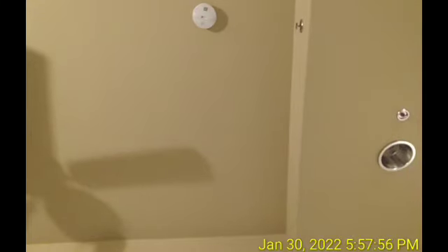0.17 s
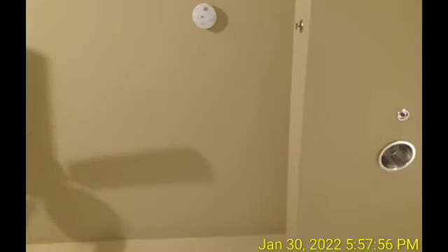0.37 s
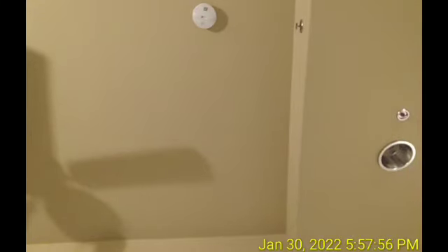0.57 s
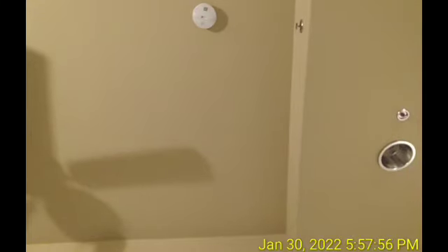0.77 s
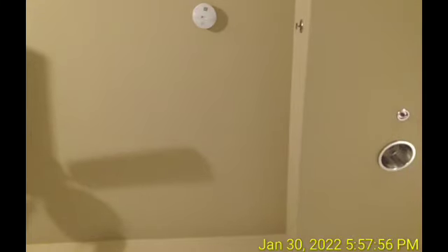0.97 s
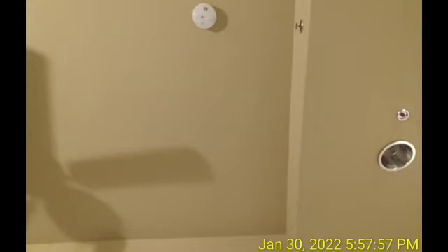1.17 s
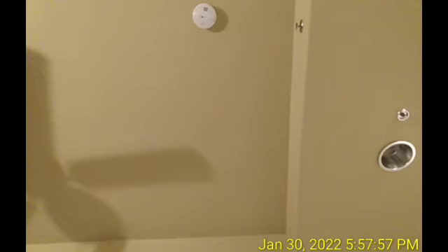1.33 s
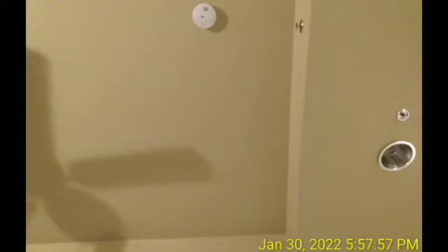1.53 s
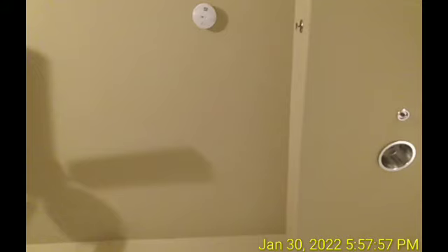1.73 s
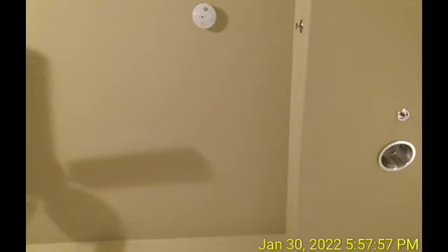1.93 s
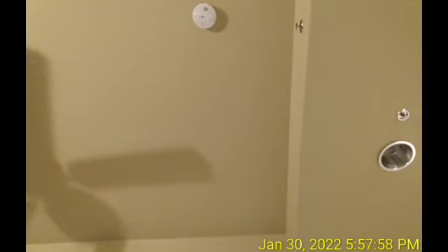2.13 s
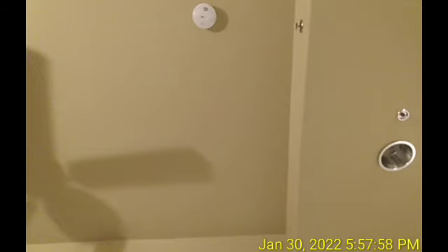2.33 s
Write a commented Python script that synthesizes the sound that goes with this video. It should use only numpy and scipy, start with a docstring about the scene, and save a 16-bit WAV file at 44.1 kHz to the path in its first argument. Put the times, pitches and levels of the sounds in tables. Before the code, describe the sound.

Heavy, muffled thumps from the floor above strike at about 0.25 and 0.7 seconds, booming low and faintly rattling fittings, then fade into quiet room hiss in a small apartment, picked up by a fixed indoor microphone.

```python
"""Heavy steps on the floor above boom in a few low ceiling modes, struck by softened clicks.
Dull noise thuds after each blow over a deep filtered-noise rumble; fittings rattle and sizzle in
noise bursts, one clinks in damped modes, and a faint scuff of resonant noise comes late.
Wavering sines make a motor's faint hum; coloured noise is the room air, and recorder hiss
swells with the thumps, as if the recorder's gain opened."""
import sys
import numpy as np
from scipy import signal
from scipy.fft import rfft, irfft
from scipy.io import wavfile

SR = 44100
rng = np.random.default_rng(int(sys.argv[2]) if len(sys.argv) > 2 else 0)


def linear_from_db(decibels):
    """Turn decibels (scalar or array-like) into linear amplitude factors; 0 gives 1."""
    return 10 ** (np.asarray(decibels, float) / 20)


def master_out(mix):
    """Clip the mix to full scale and print it as 16-bit PCM to the path in sys.argv[1]."""
    frames = np.transpose(np.atleast_2d(mix))
    ceiling = np.clip(frames, -1, 1)
    pcm = np.round(ceiling * 32767).astype(np.int16)
    wavfile.write(sys.argv[1], SR, pcm)


N = 105840  # 2.4 s

# Contacts of feet and objects overhead. Each row: start in seconds, then the strengths in dB
# that drive the boom, knock, rap and tap modes.
BLOWS = [(0.047, -62, -62, -51, -70), (0.147, -57.5, -66, -58, -80), (0.229, -47, -38.5, -66, -69),
         (.248, -33.5, -31.5, -41.5, -48), (0.27, -54, -85, -38, -56.5), (0.304, -33, -36, -37, -48),
         (0.321, -43, -81, -55, -46), (0.364, -58, -55, -71, -62.5), (0.401, -48, -60, -46, -54),
         (0.426, -65, -55, -73, -53), (0.507, -38.5, -47, -62, -60), (0.53, -65, -51, -58, -57.5),
         (0.607, -44.5, -64, -64, -63), (0.667, -53, -62, -68, -45.5), (0.682, -27.5, -50, -57, -57),
         (0.694, -49, -54, -61, -46.5), (0.708, -48, -53, -60, -55), (0.729, -36, -62, -40, -56),
         (.743, -48, -50, -44, -45.5), (0.783, -30.5, -69, -63, -52.5), (0.805, -55, -53, -38, -58),
         (0.857, -44.5, -46, -73, -52.5), (0.882, -63, -50, -67, -52.5), (0.941, -62, -68, -50, -56),
         (0.981, -46.5, -67, -59, -53.5), (1.060, -53, -56, -63, -74), (1.134, -62, -57.5, -55, -59.5),
         (1.15, -76, -49, -65, -65), (1.182, -66.5, -52.5, -54, -67.5), (1.924, -56.5, -59.5, -80, -66.5),
         (1.953, -74, -57, -57, -66), (1.984, -63, -55.5, -68, -81), (2.012, -73, -60, -62, -75),
         (2.039, -66, -56.5, -67, -75), (2.055, -59, -64, -58, -74), (2.161, -89, -68, -61, -71.5),
         (2.295, -71, -64, -71, -82)]
# Ceiling modes, by driving strength. Each row: frequency in Hz, relative level in dB, t60 in seconds.
BOOM_MODES = [(40.75, -1.5, 0.48)]
KNOCK_MODES = [(75.3, 0.22, 0.31)]
RAP_MODES = [(86.8, 0, 0.24)]
TAP_MODES = [(109, 6, 0.16), (147.9, 9, 0.12), (173.1, -15.5, 0.8), (185, -7, 0.09), (228, -13, 0.067),
             (256, -4, 0.27), (310, -0.5, 0.094), (355, -9, 0.092)]
CONTACT_S, MODE_SPREAD_DB, LEFT_LEAD_S = 0.0013, 0.97, 0.0003

# Thud colour. Each row: frequency in Hz, relative density in dB per Hz.
THUD_COLOUR = [(50, -23.5), (130, -3), (240, -13), (345, -17.5), (500, -22.5), (950, -35.5), (2000, -33.5),
               (4000, -77)]
THUD_RE_TAP_DB, THUD_T60_S, THUD_RISE_S = -6, 0.5, 0.011

# Building rumble level. Each row: time in seconds, rms level in dB.
RUMBLE_LEVEL = [(0, -58), (.2, -76), (.5, -59.5), (1.1, -62.5), (1.3, -64.5), (1.652, -62.5), (1.75, -71.5),
                (1.88, -83), (1.959, -61.5), (2.1, -67.5), (2.4, -78)]
# Rumble resonances. Each row: frequency in Hz, width in Hz, relative level in dB.
RUMBLE_PEAKS = [(39.7, 9, -0.5), (51.5, 14, -3), (73.6, 13, -10.5)]

# Shaken fittings. Each row: start in seconds, rattle level in dB, sizzle level in dB.
RATTLES = [(0.239, -66.5, -65), (.275, -66, -71), (0.31, -62.5, -70), (.350, -87, -88), (.396, -100, -74.5),
           (0.679, -86, -61.5), (0.688, -64, -64.5), (0.712, -63.5, -96), (.745, -69.5, -78),
           (0.901, -72.5, -77), (1.040, -105, -78)]
# Rattle and sizzle colours. Each row: frequency in Hz, relative density in dB per Hz.
RATTLE_COLOUR = [(500, -3.5), (1000, -7), (2200, -7), (3500, -12), (6000, -22.5), (10000, -26.5)]
SIZZLE_COLOUR = [(2000, 4), (4000, 11), (6000, 5), (12000, 7), (15300, 6)]
RATTLE_T60_S, RATTLE_RISE_S = 0.55, 0.0056
SIZZLE_T60_S, SIZZLE_RISE_S = 0.19, 0.005

# Modes of one chattering fitting. Each row: frequency in Hz, relative level in dB, t60 in seconds.
CLINK_MODES = [(2190, -11, 0.031), (2380, 3, 0.02), (2600, 10, 0.01), (2900, -6, 0.0096),
               (3220, 2.5, 0.028)]
CLINK_START_S, CLINK_GAP_S = 0.3112, 0.002
CLINK_DB, CLINK_LOSS_DB, CLINK_SPREAD_DB = -69, 0.3, 4.5  # loss per touch

# Faint scuff level. Each row: time in seconds, level in dB before the patchiness.
SCUFF_LEVEL = [(1.6, -107), (1.655, -70), (1.70, -73.5), (1.755, -78), (1.8, -84), (1.85, -100)]
# Scuff resonances. Each row: frequency in Hz, width in Hz, relative level in dB.
SCUFF_PEAKS = [(376, 56, 2), (900, 260, 2.5), (1890, 400, 0.5), (2420, 270, -8.5)]
SCUFF_PATCHY_DB, SCUFF_PATCHY_HZ = 2.5, 25.0

# Motor lines. Each row: frequency in Hz, rms level in dB before the waver.
HUM_LINES = [(59.2, -76), (177.6, -76), (236.9, -80.5), (393, -96)]
HUM_WAVER_DB, HUM_WAVER_HZ = 1.04, 4.9

# Room air colour. Each row: frequency in Hz, relative density in dB per Hz.
AIR_COLOUR = [(25, -19), (45, -14), (80, -6.5), (150, -15.5), (200, -12.5), (349, -12.5), (408, -16),
              (652, -21), (869, -24.5), (1040, -25.5), (2500, -33.5), (5840, -37.5), (15300, -39)]
AIR_DB, AIR_LEFT_LEAN_DB = -69.5, -0.5

# Recorder hiss colour. Each row: frequency in Hz, relative density in dB per Hz.
HISS_COLOUR = [(700, -5), (1500, -3), (3000, -2.3), (6000, -7), (12000, -7.5), (15300, -3)]
HISS_DB, HISS_DB_PER_DB, HISS_LAG_S = -76.5, 0.73, 0.088  # HISS_DB holds at a sound level of -40 dB

# Stereo likeness of the noises. Each row: frequency in Hz, left-right correlation from -1 to 1.
LIKENESS = [(60, 0.95), (130, 0.85), (290, 0.85), (640, 0.46), (1400, -0.34), (3080, 0.038), (6770, -0.19),
            (14900, -0.0079)]


def rms_one(x):
    """Scales to rms 1."""
    return x / np.sqrt(np.mean(x ** 2) + 1e-20)


def at_hz(points, hz):
    """Interpolates a table over log frequency."""
    table_hz, values = np.transpose(points)
    return np.interp(np.log(hz), np.log(table_hz), values)


def over_time(points):
    """Interpolates a (seconds, value) table at every sample."""
    return np.interp(np.arange(N) / SR, *np.transpose(points))


def smooth(x, seconds):
    """One-pole low-pass of unit gain at DC."""
    r = np.exp(-1 / (seconds * SR))
    return signal.lfilter([1 - r], [1, -r], x + 1e-18)


def drift(rate_hz):
    """Slow random wander of spread about 1: noise through two equal poles."""
    step = 40  # samples per drawn point
    r = np.exp(-2 * np.pi * rate_hz * step / SR)
    white = rng.standard_normal(N // step + 2002)
    slow = signal.lfilter([1], [1, -2 * r, r * r], white)[2000:]  # settled part
    return np.interp(np.arange(N) / step, np.arange(len(slow)), rms_one(slow))


def clicks(start_s, db):
    """Single-sample impulses."""
    out = np.zeros(N)
    out[(np.asarray(start_s) * SR).astype(int)] = linear_from_db(db)
    return out


def ring(x, hz, t60_s):
    """Damped mode: a unit click starts a sine of initial height 1."""
    r = linear_from_db(-60 / (t60_s * SR))
    w = 2 * np.pi * hz / SR
    return signal.lfilter([0, np.sin(w)], [1, -2 * r * np.cos(w), r * r], x + 1e-18)


def resonance(x, hz, width_hz):
    """Two-pole band-pass."""
    r = np.exp(-np.pi * width_hz / SR)
    return signal.lfilter([1, 0, -1], [1, -2 * r * np.cos(2 * np.pi * hz / SR), r * r], x)


def resonant_noise(white, peaks):
    """White noise through parallel steep resonances, each filtered twice; rms 1."""
    out = 0
    for hz, width_hz, db in peaks:
        once = resonance(white, hz, width_hz)
        out = out + linear_from_db(db) * rms_one(resonance(once, hz, width_hz))
    return rms_one(out)


def dying(start_s, db, t60_s, rise_s):
    """Envelope of decaying bursts whose powers add."""
    r = linear_from_db(-120 / (t60_s * SR))  # decay of power
    power = signal.lfilter([1], [1, -r], clicks(start_s, 2 * np.asarray(db)) + 1e-18)
    return np.sqrt(smooth(power, rise_s))


def noise(colour):
    """Coloured stereo noise of rms 1, with left-right likeness set by frequency."""
    hz = np.maximum(np.fft.rfftfreq(N, 1 / SR), 1)
    white = rfft(rng.standard_normal((2, N)))
    mid, side = white * linear_from_db(at_hz(colour, hz)) * (hz > 20) * (hz < 15480)
    alike = np.clip(at_hz(LIKENESS, hz), -1, 1)
    spectrum = np.sqrt(1 + alike) * mid + np.sqrt(1 - alike) * side * [[1], [-1]]
    return rms_one(irfft(spectrum, N))


def room_air():
    """Steady coloured noise, slightly weaker on the left."""
    return linear_from_db([[AIR_DB + AIR_LEFT_LEAN_DB], [AIR_DB]]) * noise(AIR_COLOUR)


def hum():
    """Motor hum: sine lines, each wavering in level on its own."""
    t = np.arange(N) / SR
    out = 0
    for hz, db in HUM_LINES:
        level = np.sqrt(2) * linear_from_db(db + HUM_WAVER_DB * drift(HUM_WAVER_HZ))
        out = out + level * np.sin(2 * np.pi * (hz * t + rng.random()))
    return out


def rumble():
    """The building rumbles on between blows: mono noise in low resonances under a level curve."""
    return linear_from_db(over_time(RUMBLE_LEVEL)) * resonant_noise(rng.standard_normal(N), RUMBLE_PEAKS)


def booms():
    """Each blow strikes all ceiling modes, softened by the contact time; the left leads."""
    start_s, *strengths = np.transpose(BLOWS)
    groups = (BOOM_MODES, KNOCK_MODES, RAP_MODES, TAP_MODES)
    modes = [(db, mode) for db, group in zip(strengths, groups) for mode in group]
    rung = 0
    for k, (blow_db, (hz, mode_db, t60_s)) in enumerate(modes):
        spread_db = MODE_SPREAD_DB * rng.standard_normal(len(start_s))
        sign = (-1) ** max(k - 4, 0)  # alternates from the second tap mode up
        rung = rung + sign * ring(clicks(start_s, blow_db + mode_db + spread_db), hz, t60_s)
    left = smooth(smooth(rung, CONTACT_S), CONTACT_S)
    t = np.arange(N) / SR
    return np.array([left, np.interp(t - LEFT_LEAD_S, t, left)])


def thuds():
    """Dull noise dies away after each blow, scaled by its tap strength."""
    start_s, *_, tap_db = np.transpose(BLOWS)
    return dying(start_s, tap_db + THUD_RE_TAP_DB, THUD_T60_S, THUD_RISE_S) * noise(THUD_COLOUR)


def rattles():
    """Shaken fittings: decaying bursts of mid rattle and bright sizzle."""
    start_s, rattle_db, sizzle_db = np.transpose(RATTLES)
    rattle = dying(start_s, rattle_db, RATTLE_T60_S, RATTLE_RISE_S) * noise(RATTLE_COLOUR)
    sizzle = dying(start_s, sizzle_db, SIZZLE_T60_S, SIZZLE_RISE_S) * noise(SIZZLE_COLOUR)
    return rattle + sizzle


def clink():
    """One fitting chatters: six quick uneven touches ring its modes, band-passed."""
    turn = np.arange(6)
    start_s = CLINK_START_S + CLINK_GAP_S * (turn + rng.uniform(-0.23, 0.3, len(turn)))
    out = np.zeros((2, N))
    for channel in out:
        for hz, mode_db, t60_s in CLINK_MODES:
            spread_db = CLINK_SPREAD_DB * rng.standard_normal(len(turn))
            touch_db = CLINK_DB + mode_db - CLINK_LOSS_DB * turn + spread_db
            channel += ring(clicks(start_s, touch_db), hz, t60_s)
    band = signal.butter(2, (1900, 3400), "band", fs=SR, output="sos")  # Hz
    return signal.sosfilt(band, out)


def scuff():
    """Faint scuff: patchy stereo noise in a few steep resonances."""
    level_db = over_time(SCUFF_LEVEL) + SCUFF_PATCHY_DB * drift(SCUFF_PATCHY_HZ)
    return linear_from_db(level_db) * resonant_noise(rng.standard_normal((2, N)), SCUFF_PEAKS)


def scene():
    """Sums all sources in the room."""
    return room_air() + hum() + rumble() + booms() + thuds() + rattles() + clink() + scuff()


def band_limit(x):
    """A steep low-pass at the top of the band."""
    return signal.sosfilt(signal.butter(12, 15480, fs=SR, output="sos"), x)


def record(dry):
    """Recorder hiss follows the smoothed sound level; a high-pass cuts the deep bass."""
    level_db = 10 * np.log10(smooth(np.mean(dry ** 2, axis=0), HISS_LAG_S) + 1e-12)
    hiss = linear_from_db(HISS_DB + HISS_DB_PER_DB * (level_db + 40)) * noise(HISS_COLOUR)
    low_cut = signal.butter(2, 25.7, "high", fs=SR, output="sos")  # Hz
    return band_limit(signal.sosfilt(low_cut, dry + hiss))


dry = scene()
out = record(dry)
master_out(out)
```